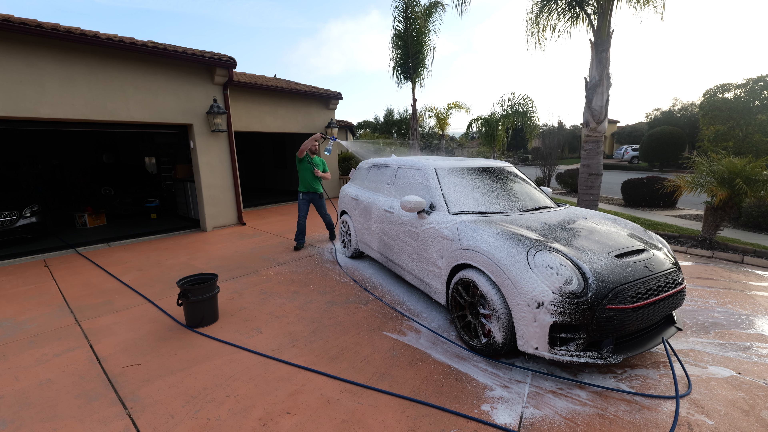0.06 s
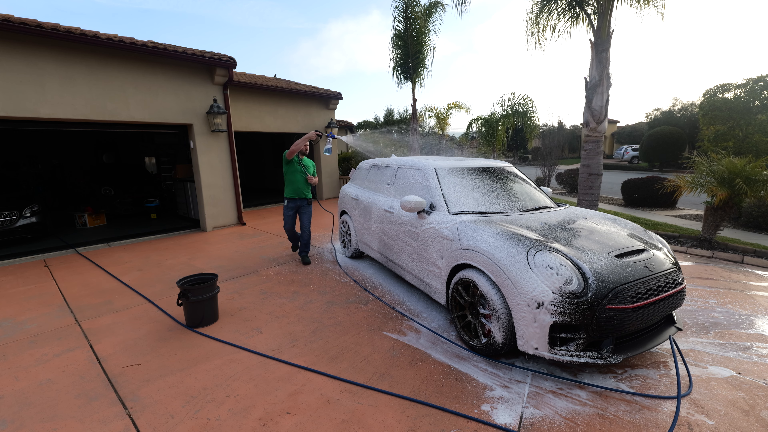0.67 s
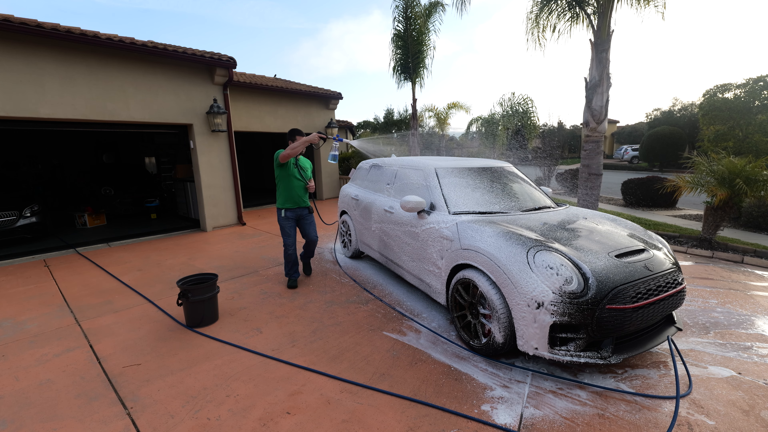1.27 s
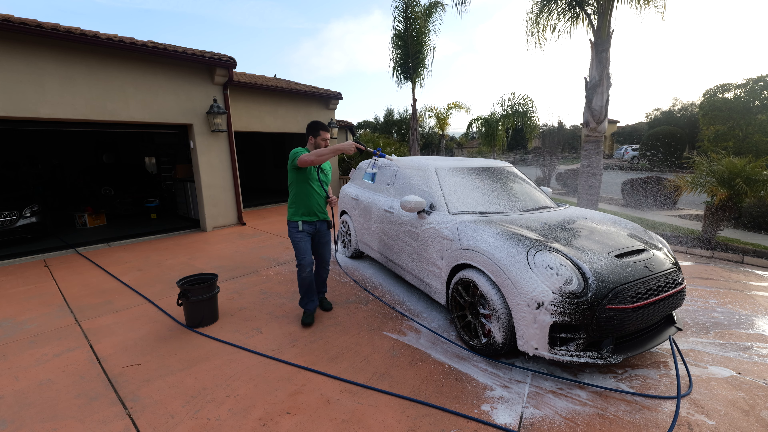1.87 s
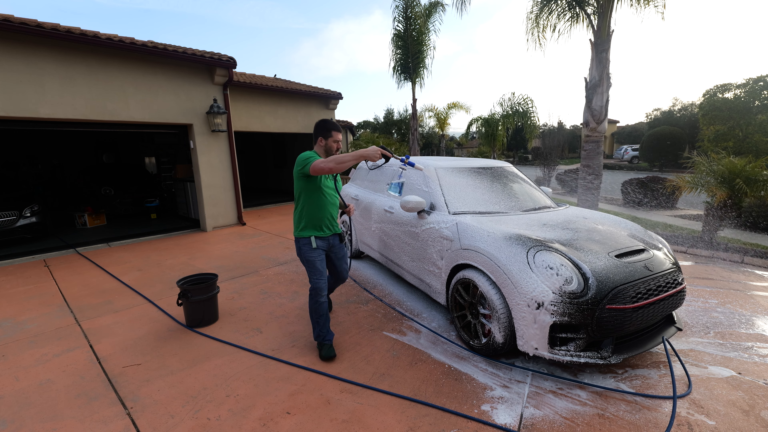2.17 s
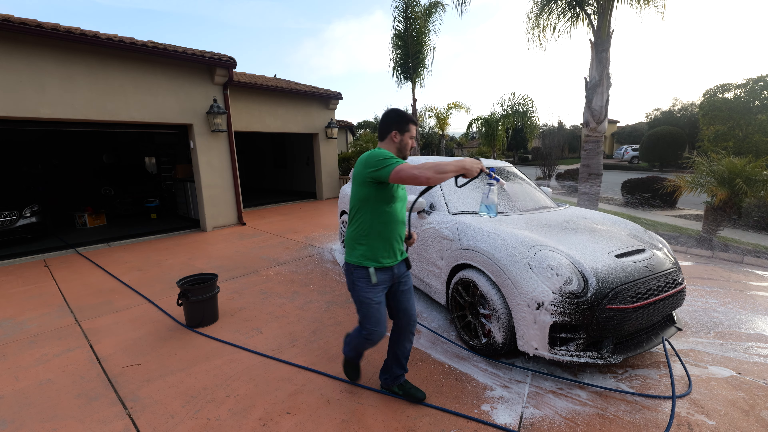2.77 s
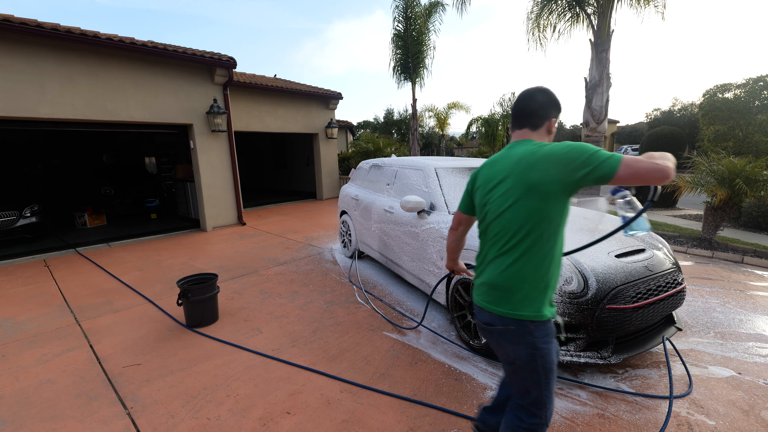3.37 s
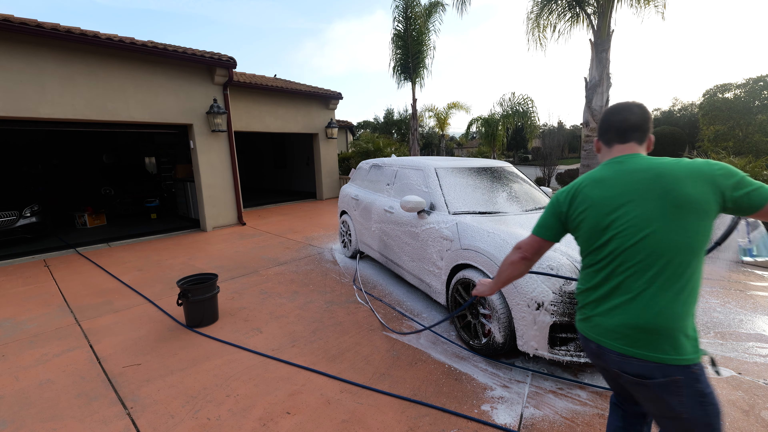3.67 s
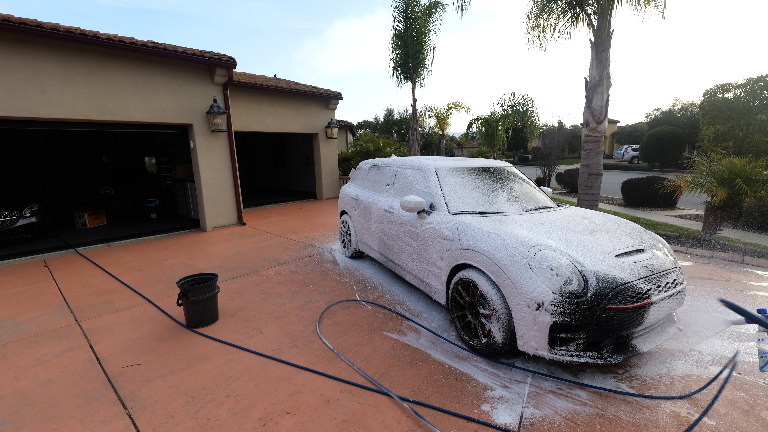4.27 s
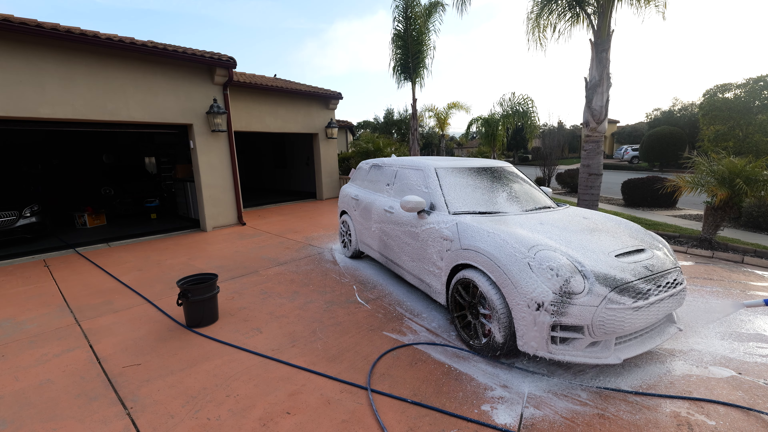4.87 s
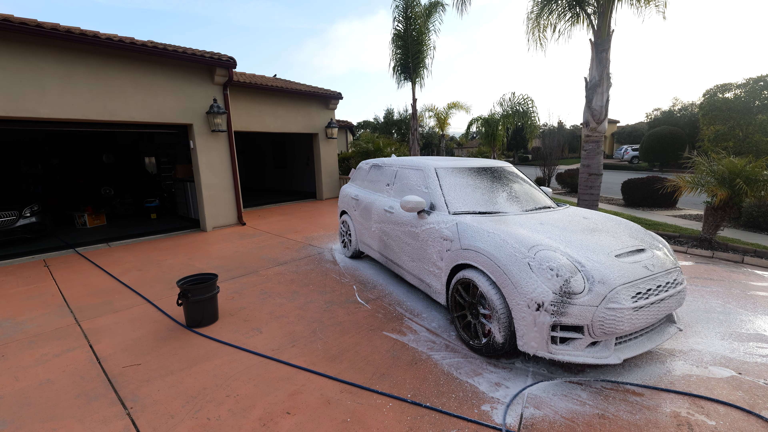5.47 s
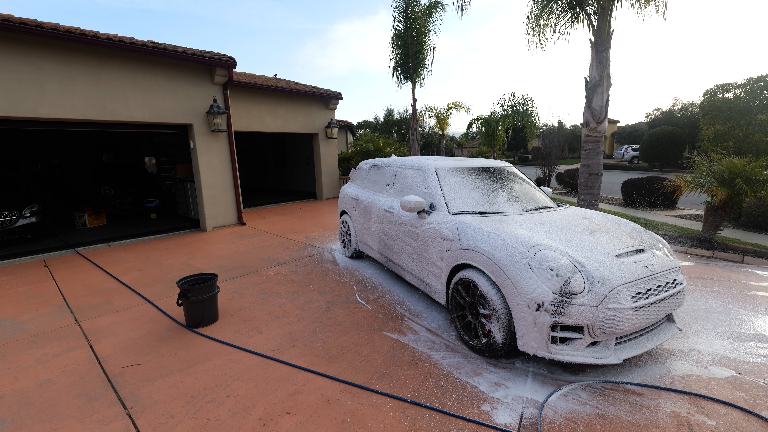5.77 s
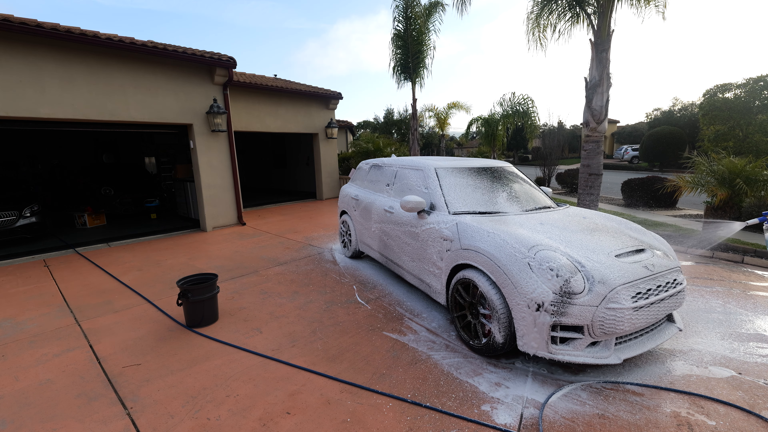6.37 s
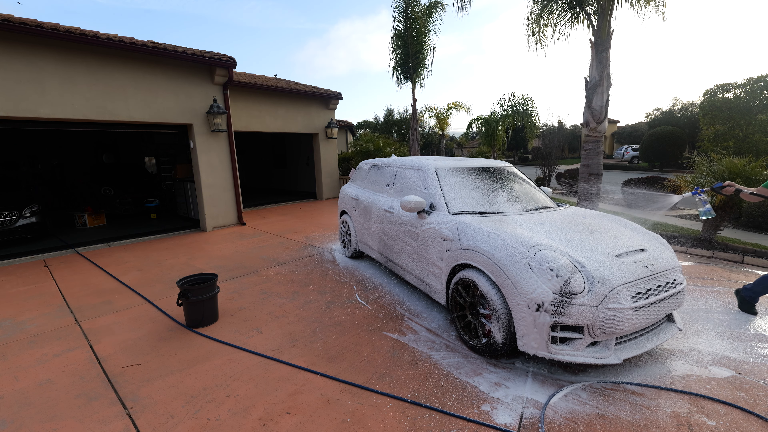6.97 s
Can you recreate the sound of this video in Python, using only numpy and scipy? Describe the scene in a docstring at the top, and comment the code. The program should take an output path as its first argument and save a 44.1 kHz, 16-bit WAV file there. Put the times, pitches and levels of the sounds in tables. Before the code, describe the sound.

A foam cannon sprays a car outdoors throughout, heard in mono: a spitting hiss over the roar and low drumming of foam on faintly ringing panels. A distant pressure washer drones very faintly underneath. For the first 3.5 seconds the roar is full as foam coats the car's side, and the hiss dulls a little between 1 and 2 seconds. Around 3 seconds the spray swells and the hood rings with a slightly falling pitch. At 3.5 seconds a soft bump sounds close by, and the hiss is muffled until about 4.3 seconds. It returns brighter, over a quieter, hollower roar on the car's nose. Drops spit, the drumming swells in short bursts, and gobs of foam slap lightly around 4.5, 5.8 and 6.3 seconds. The hiss wavers briefly near 5.3, 6.1 and 6.6 seconds and is still going at 7 seconds.

```python
"""A spitting hiss over a roar and low drumming: a man walks round a car, coating it with a foam cannon.
The jet hisses bright or dull as it is aimed; the foam roars, thuds and slaps on the panels, which ring.
Halfway he passes close by with a soft bump, moving from flank to nose, and his body shades the spray.
A distant pressure washer drones faintly. The sound is mono."""
import sys
import numpy as np
from scipy import signal
from scipy.fft import rfft, irfft
from scipy.io import wavfile

SR = 44100
rng = np.random.default_rng(int(sys.argv[2]) if len(sys.argv) > 2 else 0)


def store_pcm(level_fs):
    """Save levels as 16-bit WAV."""
    pcm = np.round(np.clip(level_fs, -1, 1) * 32767).astype(np.int16)
    wavfile.write(sys.argv[1], SR, np.atleast_2d(pcm).T)


N = 313992
FRAME = 512
HZ = np.fft.rfftfreq(FRAME * 2, 1 / SR)[:, None] + 1
FRAME_TIMES_S = np.arange(N // (FRAME // 2) + 2) * (FRAME // 2) / SR
TURN_S, SWEEP_S = 0.053, 0.046  # wand swings away or back; jet slides on or off a panel

# gap between roar and hiss, gliding with the fan's tilt: (time [s], centre [Hz], depth [dB])
SPRAY_GAP = [(0, 2980, -8.5), (1.4, 2880, 0), (2.1, 2920, 5), (3.5, 2730, 2), (3.7, 3000, 7.5),
             (4.35, 2030, 6.5), (5.0, 2960, 2.5), (5.4, 3070, 2), (6.1, 3500, 7), (6.35, 3280, 2.5),
             (6.67, 2540, 3), (7.12, 3470, 5)]


def from_db(db):
    """Decibels to gain."""
    return 10 ** (np.asarray(db) / 20)


def unit(x):
    """Scale to rms 1."""
    return x / np.sqrt(np.mean(x ** 2) + 1e-20)


def add(mix, start_s, sound):
    """Mix a sound in at a time."""
    part = mix[round(start_s * SR):][:len(sound)]
    part += sound[:len(part)]


def follow(rows):
    """Each column of a time curve, per frame."""
    times_s, *columns = np.transpose(rows)
    return [np.interp(FRAME_TIMES_S, times_s, column) for column in columns]


def per_sample(values):
    """Frame values to samples."""
    return np.interp(np.arange(N) / SR, FRAME_TIMES_S, values)


def during(start_s, length_s, edge_s):
    """Soft 0..1 window, per frame."""
    since_s = FRAME_TIMES_S - start_s
    return (np.tanh(since_s / edge_s) - np.tanh((since_s - length_s) / edge_s)) / 2


def colour(points):
    """(frequency [Hz], level [dB]) points to dB per bin."""
    hz, db = np.transpose(points)
    return np.interp(np.log(HZ), np.log(hz), db)


def hump(hz, db, octaves):
    """Spectral bell [dB]."""
    return db * np.exp(-.5 * (np.log2(HZ / hz) / octaves) ** 2)


def notch(hz, db, octaves):
    """Cancellation [dB]; negative depths do nothing."""
    return np.minimum(-hump(hz, db, octaves), 0)


def patches(depth_db, width_hz, length_s):
    """Random soft patches over frequency and time [dB]."""
    shape = (len(HZ), len(FRAME_TIMES_S))
    across = np.fft.fftfreq(len(HZ), SR / (2 * FRAME))[:, None] * width_hz
    along = np.fft.rfftfreq(len(FRAME_TIMES_S), FRAME_TIMES_S[1]) * length_s
    white = np.fft.rfft2(rng.standard_normal(shape))
    return depth_db * unit(np.fft.irfft2(white * np.exp(-2 * (across ** 2 + along ** 2)), shape))


def band_db(field_db, band_hz):
    """In-band level of unit white noise after this filter."""
    inside = (HZ > band_hz[0]) & (HZ < band_hz[1])
    return 10 * np.log10((from_db(field_db) ** 2 * inside).mean(0))


def shaped(x, field_db):
    """Time-varying filter; field_db is bins by frames."""
    frames = dict(nperseg=FRAME, noverlap=FRAME // 2, nfft=FRAME * 2)
    spectra = signal.stft(x, **frames)[2]
    return signal.istft(spectra * from_db(field_db[:, :spectra.shape[1]]), **frames)[1][:N]


def resonance(hz, width_hz, db):
    """Narrow, wavering tone fed by noise."""
    bins_hz = np.fft.rfftfreq(N, 1 / SR)
    spectrum = rfft(rng.standard_normal(N)) / (1 + ((bins_hz - hz) / width_hz) ** 2)
    return from_db(db) * unit(irfft(spectrum, N))


def wander(slow_hz, fast_hz):
    """Pink drift between two rates, rms 1."""
    hz = np.fft.rfftfreq(N, 1 / SR) + 1e-3
    weight = 1 / np.sqrt(hz * (1 + (slow_hz / hz) ** 4) * (1 + (hz / fast_hz) ** 4))
    return unit(irfft(rfft(rng.standard_normal(N)) * weight, N))


def patter(drops_per_s, spread_db, drops_db, sputter_db, sputter_hz):
    """Sputtering stream of turbulence and uneven drops, rms 1."""
    size = from_db(spread_db * np.minimum(rng.exponential(1, N), 3.5))
    drops = (rng.random(N) < drops_per_s / SR) * size
    splash = np.sqrt(signal.lfilter([1], [1, -.95], drops ** 2))  # each drop fizzes for 1 ms
    turbulence = rng.standard_normal(N)
    fizz = unit(splash * rng.standard_normal(N))
    weight = from_db(drops_db)
    stream = (turbulence + weight * fizz) / np.hypot(1, weight)
    return unit(stream * from_db(sputter_db * wander(1.4, sputter_hz)))


def pulse(t, length_s, rise_s):
    """One pressure push and its undershoot, peak 1."""
    u = t / length_s
    push = (1 - u) * np.exp(-u) * (1 - np.exp(-t / rise_s))
    return push / push.max()


def on_nose():
    """Jet position: 0 on the car's flank, 1 on its nose."""
    pass_s, crossing_s = 3.53, 0.02
    return np.clip((FRAME_TIMES_S - pass_s) / crossing_s, 0, 1)


def landing_db():
    """Strength of the foam landing on the car."""
    # (time [s], level [dB])
    foam = [(0, -45), (.65, -43.5), (1.3, -42.5), (1.8, -42), (2.75, -43.5), (3.1, -41), (3.52, -46),
            (3.6, -50), (4.15, -48), (4.6, -50), (5.05, -52.5), (5.25, -49), (5.7, -52.5), (6.1, -54.5),
            (6.6, -51), (7.12, -51)]
    return follow(foam)[0]


def sweep_db():
    """Lift of the drumming as the jet crosses hollow panels."""
    # (start [s], length [s], lift [dB])
    sweeps = [(0, 0.38, 8.5), (2.002, 0.22, 1.5), (3.122, 0.41, 6.5), (4.263, 0.45, 7), (5.138, 0.13, 10),
              (5.508, 0.47, 12.5), (6.24, 0.15, 18), (6.933, 0.15, 10)]
    return sum(db * during(start_s, length_s, SWEEP_S) for start_s, length_s, db in sweeps)


def pump():
    """Low drone of the distant pressure washer."""
    return resonance(hz=87, width_hz=36, db=-70.5)


def panel():
    """Sheet metal rings as strongly as the foam hits it."""
    return resonance(hz=770, width_hz=38, db=-15) * from_db(per_sample(landing_db()))


def bumps():
    """Footfalls and hose knocks: a brief rattle, then a dull push of air."""
    # (time [s], peak [dB], length [s], rattle re push [dB])
    knocks = [(0.484, -44, 0.0014, -6), (1.132, -41, 0.00086, -9), (3.328, -37, 0.0011, -5),
              (3.535, -31.5, 0.0023, 9), (4.947, -39, 0.00089, -9)]
    out, t = np.zeros(N), np.arange(SR // 10) / SR
    tick = np.sin(2 * np.pi * 1100 * t) * np.exp(-t / 0.00066)
    for time_s, db, length_s, rattle_db in knocks:
        add(out, time_s, from_db(db) * pulse(t, length_s, rise_s=0.0005))
        for lead_s in (.0026, .0005):  # the contact chatters twice
            add(out, time_s - lead_s, from_db(db + rattle_db) * tick)
    return out


def slaps():
    """Gobs of foam slap the bodywork nearby, each a sharp pressure dip."""
    # (time [s], peak [dB])
    gobs = [(4.277, -37), (4.492, -30), (4.652, -32), (5.407, -32.5), (5.595, -37), (5.766, -30),
            (5.795, -29.5), (5.814, -33), (5.887, -31), (6.296, -30.5), (6.311, -32), (6.329, -29),
            (6.343, -35), (6.351, -31), (7.042, -41)]
    out, t = np.zeros(N), np.arange(SR // 10) / SR
    for time_s, db in gobs:
        add(out, time_s, -from_db(db) * pulse(t, length_s=0.00033, rise_s=.0001))
    return out


def spits():
    """Fat drops spit from the stream as tiny bright puffs."""
    # (time [s], peak [dB], frequency [Hz])
    drops = [(2.006, -33, 7000), (2.143, -28, 10000), (2.235, -34, 7000), (2.593, -27, 5940),
             (2.703, -41, 6000), (3.679, -37, 4900), (3.973, -38, 4600), (4.671, -27, 5500),
             (4.774, -26, 6000), (4.906, -24, 6300), (6.842, -31, 5000), (6.926, -36, 6000)]
    out, t = np.zeros(N), np.arange(SR // 10) / SR
    for time_s, db, hz in drops:
        band = signal.butter(2, [hz * 0.7, min(hz * 1.2, SR * .45)], "band", fs=SR, output="sos")
        puff = signal.sosfilt(band, rng.standard_normal(len(t)) * np.exp(-t / 0.0014))
        add(out, time_s, from_db(db) * puff / abs(puff).max())
    return out


def drumming():
    """Heavy gobs thud on panels and ground: steadier on the flank, quieter with swells on the nose."""
    # thud spectrum: (frequency [Hz], relative density [dB])
    thud = [(15, -32), (30, -11), (55, -1), (80, -8), (110, 0.5), (200, -2), (320, -1.5), (600, -3.5),
            (2000, -30), (16000, -80)]
    field_db = colour(thud)
    level_db = landing_db() - 22.5 + 2 * on_nose() + sweep_db()
    gobs = patter(drops_per_s=130, spread_db=4.5, drops_db=-3.0, sputter_db=1.0, sputter_hz=40)
    return shaped(gobs, field_db + level_db - band_db(field_db, (50, 250)))


def bonnet_db():
    """The bonnet rings with falling pitch as the jet crosses it."""
    start_s, length_s, lift_db = 2.86, 0.53, 4.6
    hz = np.interp(FRAME_TIMES_S, [start_s, start_s + length_s], [1580, 1080])
    return hump(hz, lift_db * during(start_s, length_s, SWEEP_S), octaves=0.23)


def roar():
    """Foam hitting the car: fuller on the flank, hollower on the nose."""
    # impact spectra: (frequency [Hz], relative density [dB])
    flank_spectrum = [(60, -44), (150, -24), (260, -12), (400, -6.5), (520, -0.5), (750, 0.5), (1050, -0.5),
                      (1450, -4), (1900, -2), (2400, -4.5), (3000, -7.5), (4200, -12.5), (7000, -23),
                      (16000, -53)]
    nose_spectrum = [(60, -36), (150, -18), (260, -15.5), (400, -10.5), (550, -5.5), (780, -4.5),
                     (1100, -5.5), (1550, -6.5), (2000, -8), (2600, -9), (3300, -9.5), (4500, -10),
                     (7000, -26), (16000, -50)]
    nose = on_nose()
    grille_db = hump(2220, 0.17 * sweep_db() * nose, octaves=0.37)
    field_db = (1 - nose) * colour(flank_spectrum) + nose * colour(nose_spectrum)
    field_db += bonnet_db() + grille_db + notch(*follow(SPRAY_GAP), octaves=0.36)
    field_db += patches(depth_db=0.92, width_hz=720, length_s=0.32)
    level_db = landing_db() + 0.077 * sweep_db() + 1.76
    foam = patter(drops_per_s=600, spread_db=-0.5, drops_db=-4.5, sputter_db=.5, sputter_hz=80)
    return shaped(foam, field_db + level_db - band_db(field_db, (400, 2200)))


def turn_loss_db():
    """Loss in the jet's three bands as the wand turns aside or his body shades it."""
    # (start [s], length [s], hiss loss [dB], fizz loss [dB], mist loss [dB])
    turns = [(0.962, 0.4, 3, 7.5, 2.5), (1.44, 0.51, 2, 6.5, 2.5), (2.7, 0.14, 2.5, 6.5, 3.5),
             (3.572, 0.73, 5.5, 11.5, 11.5), (4.71, 0.4, 3, 1.5, 6), (5.3, 0.17, 3.5, 2.7, 6),
             (6.061, 0.12, 11.5, 13.5, 17), (6.58, 0.25, -0.3, 6, 11)]
    return sum(np.outer(loss_db, during(start_s, length_s, TURN_S))
               for start_s, length_s, *loss_db in turns)


def echoes_db():
    """Echoes notch and ripple the hiss, most beside the flank."""
    # cancellations as the jet turns: (start [s], length [s], centre [Hz], depth [dB])
    turn_notches = [(.75, 1.3, 6000, 4), (3.65, .55, 7400, 5), (3.85, 0.28, 5700, 10), (4.2, 0.51, 6450, 3),
                    (5.27, 0.19, 9500, 13), (6.57, .27, 9800, 8)]
    # cancellations off flank and ground: (time [s], centre [Hz], depth [dB])
    low_notch = [(0, 7800, 13), (.8, 7900, 2), (1.8, 7150, 9), (2.3, 7450, 7), (3.4, 7900, 1)]
    high_notch = [(0, 9600, 5), (.7, 11100, 3.5), (1.4, 9500, -1), (2.3, 10300, 3.5), (3.2, 10800, 5.5)]
    turning_db = sum(notch(hz, db * during(start_s, length_s, TURN_S), octaves=0.05)
                     for start_s, length_s, hz, db in turn_notches)
    flank_db = notch(*follow(low_notch), octaves=0.07) + notch(*follow(high_notch), octaves=0.11)
    nose = on_nose()
    ripple_db = patches(depth_db=np.interp(nose, [0, 1], [1.3, 0.76]), width_hz=570, length_s=0.18)
    return turning_db + (1 - nose) * flank_db + ripple_db


def nozzle_db():
    """Two nozzle resonances, stronger when a turn takes more fizz than hiss."""
    # lower resonance: (time [s], centre [Hz], lift before turns [dB])
    ring = [(0, 5050, 6.5), (.93, 5300, 1), (1.08, 4220, -5), (2.0, 4150, 3.5), (3.5, 4360, 0),
            (4.13, 4170, 9), (4.22, 4220, -9), (4.6, 4400, 1), (5.5, 4730, 3), (6.1, 4900, -2.5),
            (7.12, 4200, -5)]
    hz, lift_db = follow(ring)
    hiss_loss_db, fizz_loss_db, _ = turn_loss_db()
    lift_db += 1.1 * (fizz_loss_db - hiss_loss_db)
    return hump(hz, lift_db, octaves=0.048) + 0.71 * hump(hz * 1.104, lift_db, octaves=.05)


def aimed(field_db):
    """The treble is beamed: its band levels follow the walk and the wand's turns."""
    # jet before turns: (time [s], hiss [dB], fizz re hiss [dB], finest mist re hiss [dB])
    walk = [(0.0, -44.5, -4, 1.5), (0.26, -44.5, -1.4, 5), (0.81, -45, -5, -0.2), (1.48, -47.5, -1, 2.5),
            (2.06, -46, -5.5, -4), (2.6, -43.5, -6, -3.9), (3.31, -40.5, -5, -5.5), (3.52, -42.5, -5, -4.6),
            (3.62, -47.5, -1, 5), (4.0, -43.5, -8.5, -5.5), (4.3, -47, 7.5, 7.5), (4.72, -40.3, -2, -2.5),
            (5.19, -40.5, 1, 1), (5.74, -41, 1.0, 1.4), (5.92, -45.5, 3.5, 3.5), (6.28, -41, 3.5, 3.5),
            (6.49, -46, 2, 0.5), (7.12, -45.5, 4, 2)]
    # hiss, fizz and mist bands: (low [Hz], high [Hz])
    bands = [(4000, 7000), (7500, 11000), (11500, 15500)]
    hiss_db, fizz_db, mist_db = follow(walk)
    levels_db = np.array([hiss_db, hiss_db + fizz_db, hiss_db + mist_db]) - turn_loss_db()
    log_centres = np.log(np.mean(bands, 1))
    shares = [np.interp(np.log(HZ), log_centres, row) for row in np.eye(len(bands))]
    for _ in range(2):  # neighbouring shares overlap, so they settle together
        field_db = field_db + sum(share * (db - band_db(field_db, band))
                                  for share, db, band in zip(shares, levels_db, bands))
    return field_db


def jet():
    """Nozzle and mist hiss above a gliding lower edge; droplets crackle in the stream."""
    # spray strikes an edge or wet ground: (start [s], length [s])
    crackles = [(0, 1.0), (2.05, .72), (4.75, 0.29), (5.78, .4), (6.53, 0.24)]
    edge_hz = follow(SPRAY_GAP)[0] * np.interp(on_nose(), [0, 1], [1.19, 1.42])
    highpass_db = -10 * np.log10(1 + (edge_hz / HZ) ** 9)
    base_db = colour([(2000, -1.5), (5000, 0.27), (6500, 0.58), (9000, -1.6),
                      (11000, 0.057), (12300, 0.96), (14000, -0.64), (16000, -1.9)])
    gap_db = notch(*follow(SPRAY_GAP), octaves=0.19)
    field_db = aimed(base_db + highpass_db + nozzle_db() + gap_db + echoes_db())
    field_db += patches(depth_db=0.57, width_hz=2500, length_s=0.023)  # droplet clumps flicker
    crackling = sum(during(start_s, length_s, SWEEP_S) for start_s, length_s in crackles)
    drops_db = per_sample(-7.5 + 6 * crackling)
    spray = patter(drops_per_s=800, spread_db=4.0, drops_db=drops_db, sputter_db=0.5, sputter_hz=200)
    return shaped(spray, field_db)


def scene():
    """All sources, alike in both channels."""
    mono = jet() + roar() + drumming() + panel() + pump() + bumps() + slaps() + spits()
    return np.tile(mono, (2, 1))


def record(dry):
    """Steep low-pass band limit."""
    cutoff_hz = 15760
    lowpass = signal.firwin(801, cutoff_hz, window=("kaiser", 9), fs=SR)
    return signal.oaconvolve(dry, lowpass[None], "same", axes=1)


dry = scene()
out = record(dry)
store_pcm(out)
```